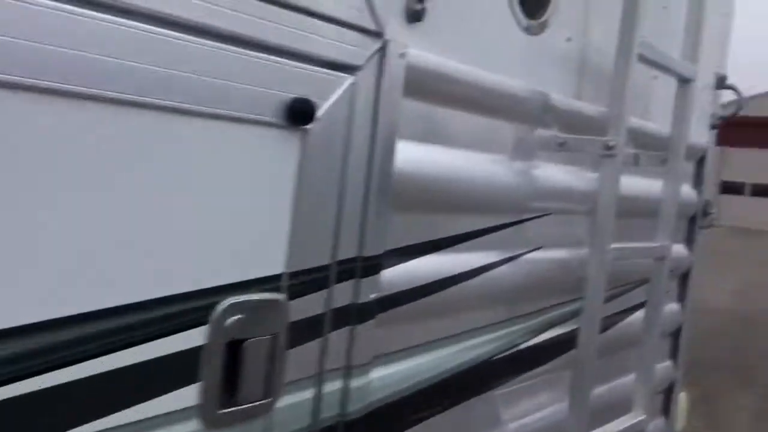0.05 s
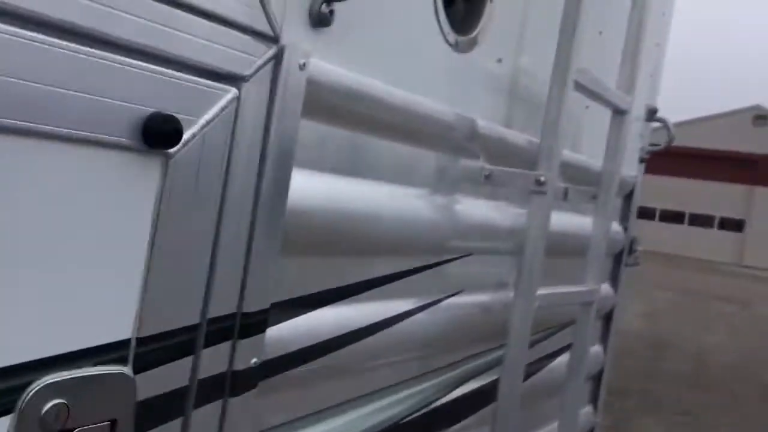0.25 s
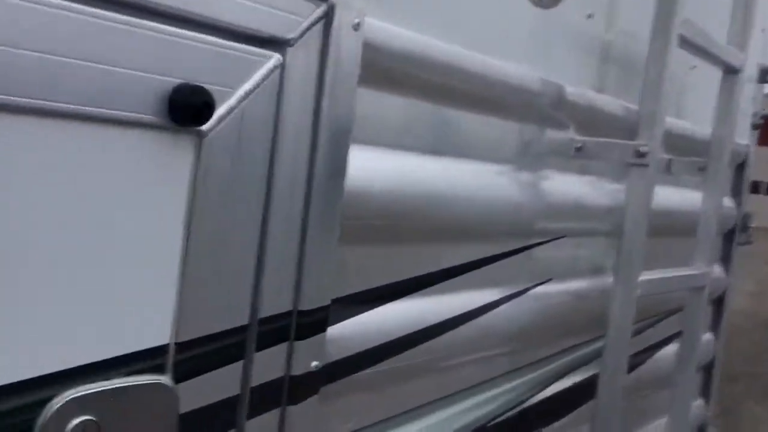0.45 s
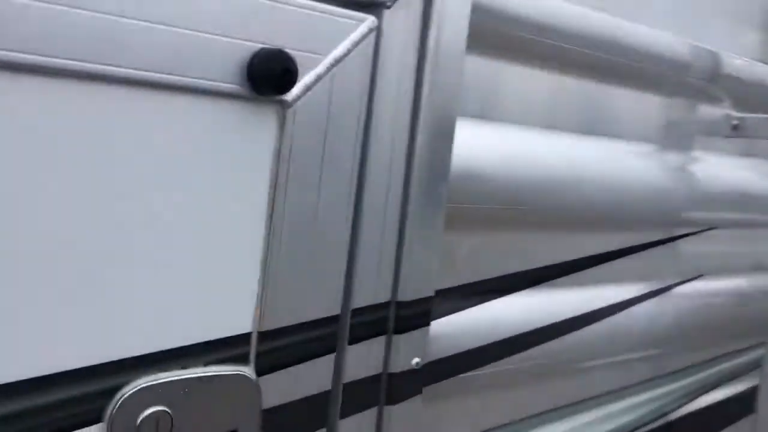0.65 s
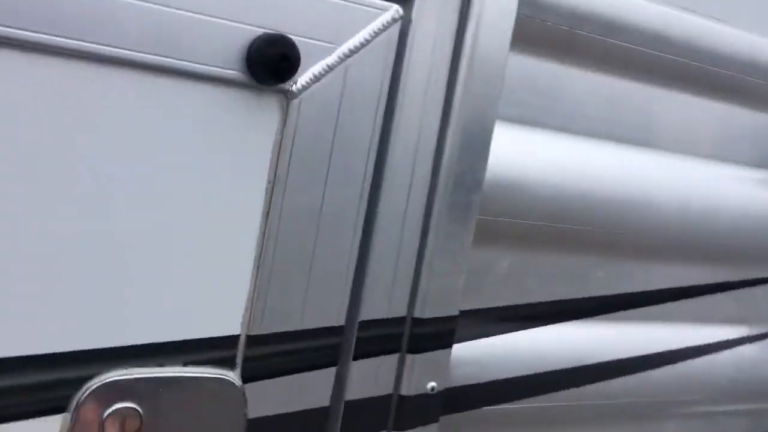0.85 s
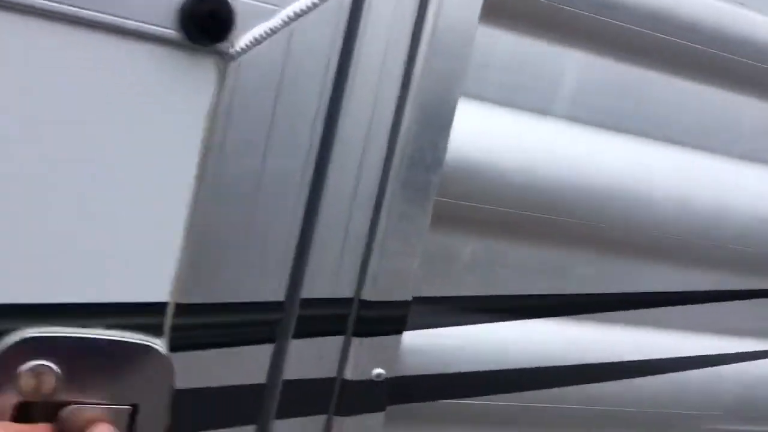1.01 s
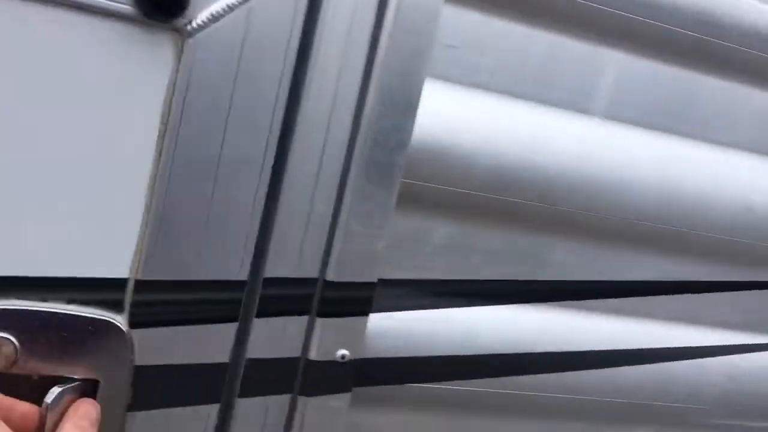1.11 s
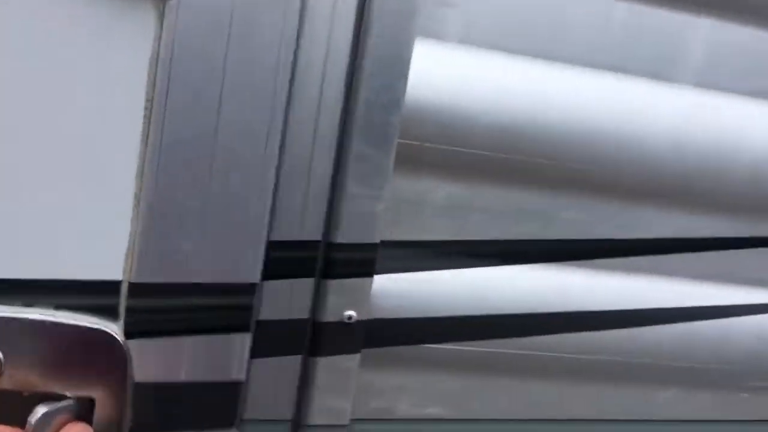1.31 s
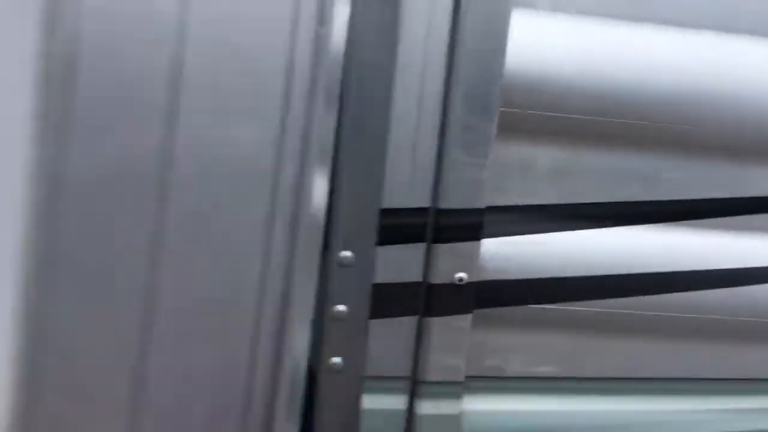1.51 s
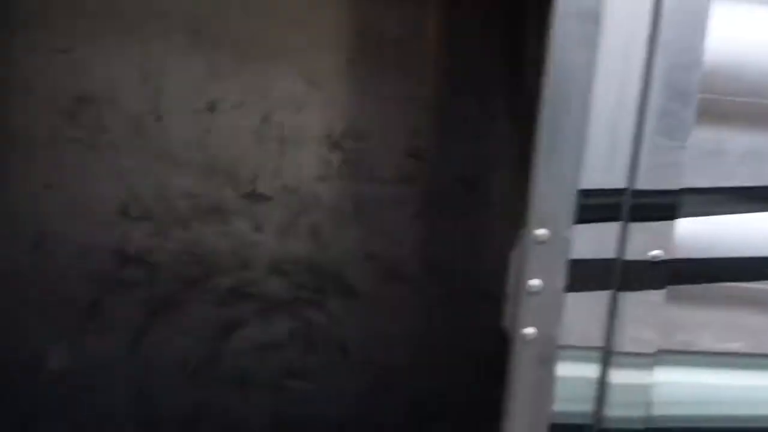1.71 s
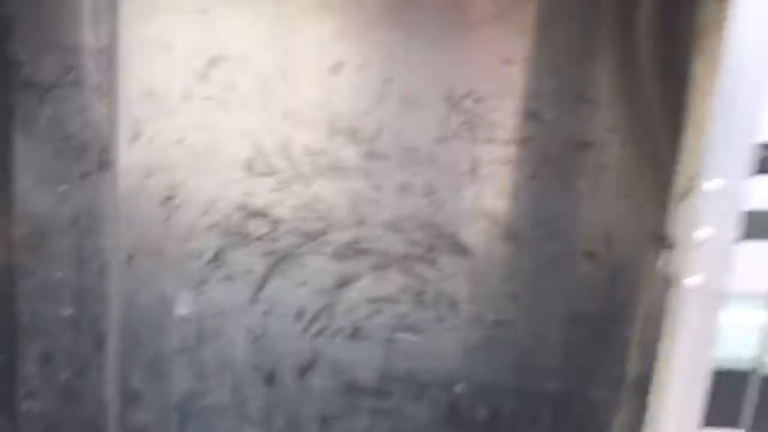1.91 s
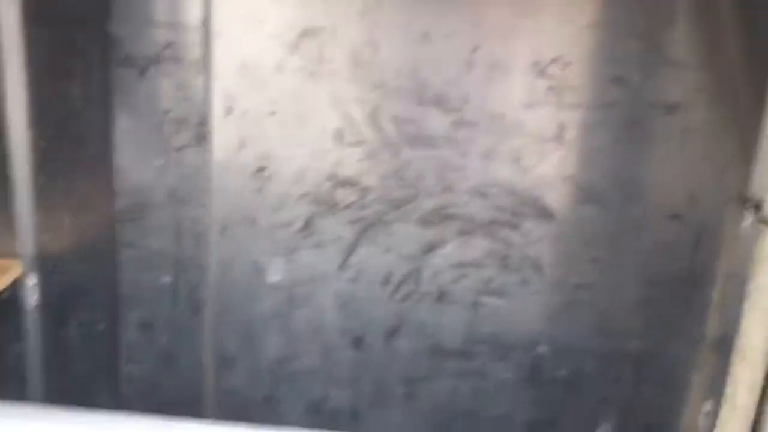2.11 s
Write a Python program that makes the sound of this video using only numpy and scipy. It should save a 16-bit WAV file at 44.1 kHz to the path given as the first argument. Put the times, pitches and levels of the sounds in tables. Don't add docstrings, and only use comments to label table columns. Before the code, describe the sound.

Outdoors, close up: a loud hollow metal door bang with fast chatter and faint sheet shimmer, small ticks, a crisp handle click, then low wind thumps and a softer knock over distant traffic rumble.

```python
import sys
import numpy as np
from scipy import signal
from scipy.fft import rfft, irfft
from scipy.io import wavfile
from scipy.ndimage import uniform_filter1d

SR = 44100
rng = np.random.default_rng(int(sys.argv[2]) if len(sys.argv) > 2 else 0)


def generate_wav(sig):
    pcm = np.round(np.clip(np.atleast_2d(sig).T, -1, 1) * 32767).astype(np.int16)
    wavfile.write(sys.argv[1], SR, pcm)


def invert_db(level):
    return 10 ** (np.asarray(level, dtype=float) / 20)


N = 94815
T = np.arange(N) / SR

# frequency in Hz, level in dB.
DOOR_CRACK = [(250, -46), (500, -7.5), (1020, -8), (1800, -7.5), (2500, -18), (4950, -21), (6390, -26),
              (16000, -38.5)]
# frequency in Hz, level in dB.
BOLT_CRACK = [(290, -38), (600, -10), (1210, -1), (2070, -7.5), (3390, -8), (7310, -31), (16000, -47)]
# start in seconds, snap, rattle and ring in dB, rattle length in seconds.
REBOUND = [
    (.2361, -7.5, -14, -3.5, 0.019),
    (.2432, -35, -24.5, -11, 0.0064),
    (.2465, -19, -13, -28.5, 0.0047),
]


def evened(x):
    return x / np.sqrt(np.mean(x ** 2) + 1e-20)


def noise(points, length=N):
    f_hz, level_db = np.transpose(points)
    hz = np.fft.rfftfreq(length, 1 / SR)
    shape_db = np.interp(np.log(hz + 1), np.log(f_hz + 1), level_db, right=-90)
    return evened(irfft(rfft(rng.standard_normal(length)) * invert_db(shape_db), length))


def curve(points):
    return invert_db(np.interp(T, *np.transpose(points)))


def lumps(hz, db):
    lowpass = signal.butter(2, hz, fs=SR, output="sos")
    return invert_db(db * evened(signal.sosfiltfilt(lowpass, rng.standard_normal(N))))


def decay(t, t60_s):
    return invert_db(-60 * t / t60_s)


def add(mix, start_s, sound):
    part = mix[round(start_s * SR):][:len(sound)]
    part += sound[:len(part)]


def road():
    # frequency in Hz, level in dB.
    spectrum = [(100, -46), (200, -6.5), (380, -7), (545, -10.5), (821, -2), (1400, -2.5), (2450, -15),
                (5910, -37), (16000, -54.5)]
    # time in seconds, level in dB.
    level = [(0, -44), (.2, -44), (.4, -42.5), (.7, -41.5), (1.1, -43), (1.6, -41.5), (1.8, -45.5),
             (2.15, -46)]
    return noise(spectrum) * curve(level) * lumps(10, 0.31)


def rustle():
    # time in seconds, level in dB.
    level = [(0, -63), (.2, -67.5), (.6, -73), (1.09, -66.5), (1.115, -52), (1.14, -60.5), (1.3, -66.5),
             (1.6, -58.5), (1.75, -62), (2.15, -66)]
    spectrum = [(1500, -4), (4000, -7.5), (9000, -19.5), (16000, -27.0)]
    return noise(spectrum) * curve(level) * lumps(78, 0.97)


def rumble():
    # frequency in Hz, level in dB.
    spectrum = [(12, -54), (20, -38), (38, -3), (97, 2.5), (129, -11), (197, -14), (226, -38), (260, -18),
                (340, -47.5), (570, -120)]
    # time in seconds, level in dB.
    level = [(0, -48), (.2, -35.5), (.7, -38.5), (1.2, -38), (1.5, -44.5), (2.15, -35)]
    return noise(spectrum) * curve(level) * lumps(2.7, 0.63)


def ticks():
    # start in seconds, level in dB, pitch in Hz.
    tick_rows = [(0.035, -62, 7960), (0.189, -54, 7850), (.2005, -74, 9500), (.3167, -39, 6200),
                 (0.4298, -43.5, 3120), (0.4466, -43, 3750), (.452, -60.5, 7500), (0.5204, -44.5, 3740),
                 (0.6636, -65, 6480), (0.7116, -56, 4500), (.754, -60.5, 11000), (0.804, -47.5, 6000),
                 (0.8698, -66.5, 11000), (1.1084, -59, 7500), (1.1158, -64.5, 7500), (1.7298, -68, 13000),
                 (1.9478, -52, 3210), (2.0124, -53.5, 4630)]
    out, t = np.zeros(N), T[:2048]
    envelope = (decay(t, 0.028) + invert_db(-11.5) * decay(t, 0.051)) * np.minimum(t * 2000, 1)
    for start_s, db, hz in tick_rows:
        puff = noise([(hz / 3, -16), (hz, 0), (hz * 1.5, -10), (hz * 2.2, -35)], len(t))
        add(out, start_s, invert_db(db) * puff * envelope)
    return out


def gust():
    # frequency in Hz, level in dB.
    spectrum = [(12, -81.5), (20, -11), (59, 7.5), (149, 0.5), (215, -9.5), (248, -5), (535, -27.5),
                (600, -40.5), (780, -78), (1320, -120)]
    # time in seconds, level in dB.
    level = [(.2, -69), (.28, -20.5), (.33, -28), (.42, -36), (.51, -32.5), (.6, -52.5), (1.5, -43),
             (1.7, -35), (1.76, -34.5), (1.82, -38), (1.88, -35.5), (2.0, -43.5), (2.15, -67)]
    return noise(spectrum) * curve(level) * lumps(38, 1.4)


def hits(blows, crack, modes, snap_t60, tail_db, tail_t60, tail_hz, damp, strike):
    # frequency in Hz, level in dB.
    snap_spectrum = [(500, -11), (1500, -4.5), (4500, 4.5), (8500, 4), (12500, -6), (14800, -30),
                     (16000, -26)]
    out, t = np.zeros(N), T[:16384]
    tail_lowpass = signal.butter(2, tail_hz, fs=SR, output="sos")
    for start_s, snap_db, rattle_db, ring_db, rattle_s in blows:
        snap = invert_db(snap_db) * decay(t, snap_t60) * noise(snap_spectrum, len(t))
        hold = np.exp(-(t / rattle_s) ** 3)
        onset = 1 - np.exp(-t / 0.00093)
        rattle = invert_db(rattle_db) * noise(crack, len(t)) * hold * onset
        dull = signal.sosfilt(tail_lowpass, noise(crack, len(t)))
        tail = invert_db(rattle_db + tail_db) * decay(t, tail_t60) * dull

        modal = np.zeros(len(t))
        for hz, db, t60_s in modes:
            modal += invert_db(db) * decay(t, min(t60_s * damp, 0.25)) * np.sin(2 * np.pi * hz * t)
        shake = rng.standard_normal(4096) * (hold + invert_db(-20.5) * decay(t, tail_t60))[:4096]
        shake[0] += strike
        ring = signal.fftconvolve(modal, shake / np.linalg.norm(shake))[:len(t)]
        add(out, start_s, snap + rattle + tail + invert_db(ring_db) * ring)
    return out


def slam():
    # start in seconds, snap, rattle and ring in dB, rattle length in seconds.
    blows = [
        (.2118, -8, -12, -9, 0.017),
    ]
    # pitch in Hz, level in dB, t60 in seconds.
    panel = [(546, 0.5, .05), (658, -5, 0.067), (797, -4.5, 0.034), (1244, -7, .03), (1030, -8, .06),
             (1130, -6, 0.051), (1500, 4, 0.037), (1825, -13, .06), (4064, -24.5, .04), (4670, -14, 0.03),
             (5360, -25, .04), (5730, -19, .04), (7750, -21.5, 0.03)]
    return hits(blows, DOOR_CRACK, panel, snap_t60=0.02, tail_db=-6.5, tail_t60=0.25,
                tail_hz=11000, damp=0.48, strike=18)


def thuds():
    # start in seconds, level in dB, pitch in Hz, t60 in seconds.
    thud_rows = [(0.217, -7.5, 316.7, 0.13), (0.223, 0, 85.9, 0.14), (0.2242, -3, 201.3, 0.05),
                 (.263, -21, 189, .15), (.268, -25, 357.5, 0.16), (0.258, -9.5, 51, 0.24),
                 (0.491, -27.5, 69.5, 0.38), (1.149, -23, 265, 0.087), (1.646, -19.5, 112, 0.07),
                 (1.8222, -7, 91.3, .11), (1.8225, -13, 177, 0.08), (1.823, -21, 327, 0.046),
                 (2.138, -19.5, 57.6, 0.57)]
    out, t = np.zeros(N), T[:20000]
    onset = np.minimum(t / 0.0015, 1)
    for start_s, db, hz, t60_s in thud_rows:
        add(out, start_s, -invert_db(db) * decay(t, t60_s) * np.sin(2 * np.pi * hz * t) * onset)
    return out


def rebound():
    # pitch in Hz, level in dB, t60 in seconds.
    ring_modes = [(623, -8, 0.049), (956, -5.5, 0.047), (1012, -6, 0.051), (1008, 0.5, 0.11),
                  (1754, -11, 0.061), (1826, -6.5, 0.068), (2580, -3.5, 0.039), (3630, -0.5, 0.012),
                  (4300, -16, 0.027), (4375, -19, .03), (5590, -15, .025), (6470, -4.5, .025),
                  (7500, -25, .03)]
    return hits(REBOUND, DOOR_CRACK, ring_modes, snap_t60=0.017, tail_db=-19.5, tail_t60=0.13,
                tail_hz=11980, damp=0.42, strike=16)


def sheet():
    t = np.maximum(T - REBOUND[0][0], 0)
    shimmer = noise([(2500, -7), (4500, -6.5), (6300, -5), (8500, -16), (12000, -22)])
    envelope = invert_db(-44.5) * decay(t, 1.0) * np.minimum(t / 0.014, 1)
    return shimmer * lumps(49, 2.5) * envelope


def settle():
    # start in seconds, snap, rattle and ring in dB, rattle length in seconds.
    blows = [
        (.2630, -10.5, -16, -6, 0.0065),
    ]
    # pitch in Hz, level in dB, t60 in seconds.
    ring_modes = [(650, -4, 0.066), (869, -3.5, 0.23), (960, -12, .06), (1576, -1, .05), (1810, 2, 0.049),
                  (1966, -9, 0.11), (2380, -5.5, 0.044), (3000, -9, 0.057), (3690, -15, 0.041),
                  (4250, -16, .06), (4440, -21.5, 0.055), (5720, -17.5, .05)]
    return hits(blows, DOOR_CRACK, ring_modes, snap_t60=0.0074, tail_db=-4.5, tail_t60=0.21,
                tail_hz=13000, damp=0.44, strike=3)


def eddies():
    # centre in seconds, level in dB, pitch in Hz, half length in seconds.
    whirls = [(0.306, -13.5, 76.5, 0.011), (0.33, -27, 60, .01), (1.717, -32.5, 330, .005),
              (1.8, -24, 260, 0.0076), (1.706, -28.5, 75.6, .014), (1.735, -25.5, 126, 0.0085),
              (1.75, -19, 75, 0.015), (1.781, -17, 144, 0.0096), (1.798, -15, 138, 0.0083),
              (1.810, -16.5, 161, 0.0038), (1.848, -13, 111, 0.0062), (1.858, -25, 112, 0.013),
              (1.867, -20.5, 183, 0.0098), (1.892, -18, 81.4, 0.0083), (1.91, -24, 70, 0.0099),
              (1.928, -23.5, 111, 0.0077), (1.953, -25.5, 50.6, 0.022), (1.979, -22.5, 65, 0.0088),
              (2.02, -23.5, 75, 0.0069)]
    out = np.zeros(N)
    for centre_s, db, hz, half_s in whirls:
        t = T - centre_s
        out += invert_db(db) * np.exp(-(t / half_s) ** 2) * np.cos(2 * np.pi * hz * t)
    return out


def latch():
    # start in seconds, snap, rattle and ring in dB, rattle length in seconds.
    blows = [
        (1.147, -29.5, -15, -25.5, 0.00067),
        (1.1533, -23, -19, -27.5, 0.0022),
    ]
    # frequency in Hz, level in dB.
    crack = [(180, 1), (300, 22.5), (801, -17), (1390, 12.5), (2500, 3.5), (4160, 2), (11500, -49),
             (16000, -63.5)]
    # pitch in Hz, level in dB, t60 in seconds.
    lever = [(1330, -1.5, 0.032), (3200, -11, 0.0088), (4070, 7, 0.013), (4200, -8, 0.009),
             (6250, 1.5, 0.024), (7230, -23, 0.015)]
    return hits(blows, crack, lever, snap_t60=0.016, tail_db=-6.5, tail_t60=0.02,
                tail_hz=10000, damp=0.63, strike=15)


def catch():
    # start in seconds, snap, rattle and ring in dB, rattle length in seconds.
    blows = [
        (1.1723, -24, -21, -18, 0.0017),
    ]
    # pitch in Hz, level in dB, t60 in seconds.
    bolt = [(850, -30, 0.017), (1350, 0.5, 0.053), (1510, 3.5, 0.019), (2050, -7, 0.0084),
            (2600, -1, 0.016), (4100, -37, 0.013)]
    return hits(blows, BOLT_CRACK, bolt, snap_t60=0.008, tail_db=-4, tail_t60=0.039,
                tail_hz=9000, damp=0.49, strike=86)


def flutter():
    # time in seconds, level in dB.
    level = [(1.6, -69), (1.72, -37), (1.76, -41), (1.795, -25), (1.825, -33), (1.865, -30), (1.93, -50),
             (2.0, -53.5)]
    return noise([(60, -28), (120, -5.5), (200, -3), (380, -16.0), (600, -35.5)]) * curve(level)


def stop():
    # start in seconds, snap, rattle and ring in dB, rattle length in seconds.
    blows = [
        (1.8167, -15, -20.5, -18.5, 0.0058),
        (1.8222, -40, -25, -33, 0.003),
    ]
    # frequency in Hz, level in dB.
    crack = [(400, -27), (1000, -1), (1460, -4.5), (2600, 0), (4500, -18), (6400, -5.5), (10000, -13),
             (12300, -4), (16000, -42)]
    # pitch in Hz, level in dB, t60 in seconds.
    frame = [(700, -9.5, 0.079), (1225, -10, 0.069), (1416, 3, 0.053), (1530, -7.5, 0.09),
             (2190, 1.5, 0.016), (2660, -1.5, 0.028), (3230, -18, 0.035), (6200, 3.5, 0.004),
             (8200, -16, .008), (12300, -4, .008), (12500, -24, .05)]
    return hits(blows, crack, frame, snap_t60=0.0072, tail_db=-9.5, tail_t60=0.13,
                tail_hz=10000, damp=1, strike=13.4)


def release():
    # start in seconds, snap, rattle and ring in dB, rattle length in seconds.
    blows = [
        (2.0036, -47, -37.5, -31.5, 0.0013),
        (2.0075, -64.5, -52, -47, 0.0043),
    ]
    # pitch in Hz, level in dB, t60 in seconds.
    spring = [(1164, 2, 0.031), (1510, -8.5, 0.037), (3000, -6.5, 0.023), (4120, -2, 0.0065),
              (5350, -11, 0.0092)]
    return hits(blows, BOLT_CRACK, spring, snap_t60=0.004, tail_db=-0.5, tail_t60=0.079,
                tail_hz=9000, damp=0.72, strike=22)


def scene():
    background = road() + rustle() + rumble()
    closing = slam() + thuds() + rebound() + sheet() + settle()
    handle = latch() + catch() + release()
    moving_air = gust() + eddies() + flutter()
    return (background + ticks() + closing + handle + moving_air + stop())[None]


def band_limit(x):
    return signal.sosfilt(signal.butter(12, 16410, fs=SR, output="sos"), x)


def record(dry):
    threshold_db, duck_ratio, ceiling = -22, 0.3, 0.72
    power_db = 10 * np.log10(abs(uniform_filter1d(dry[0] ** 2, 900, origin=440)) + 1e-12)
    recovery_db = T * 20.0
    peak_db = np.maximum.accumulate(power_db + recovery_db) - recovery_db
    over_db = np.maximum(peak_db - threshold_db, 0)
    duck_db = -duck_ratio * uniform_filter1d(over_db, 1600, origin=790)
    held = ceiling * np.tanh(dry * invert_db(duck_db) / ceiling)
    edge = signal.cheby2(14, 50, 16450, fs=SR, output="sos")
    return band_limit(signal.sosfilt(edge, held))


dry = scene()
out = record(dry)
generate_wav(out)
```